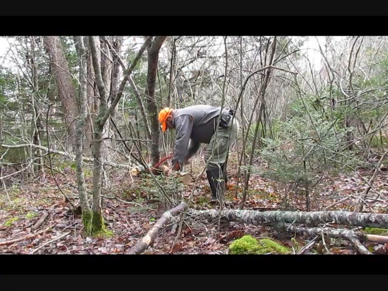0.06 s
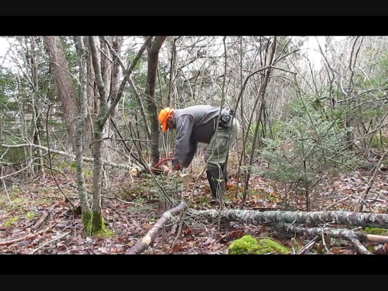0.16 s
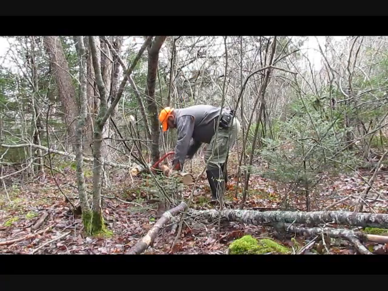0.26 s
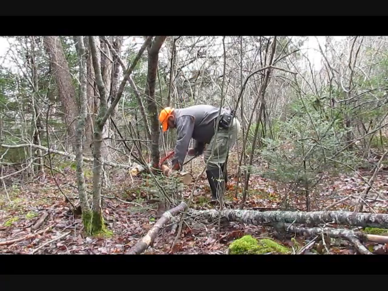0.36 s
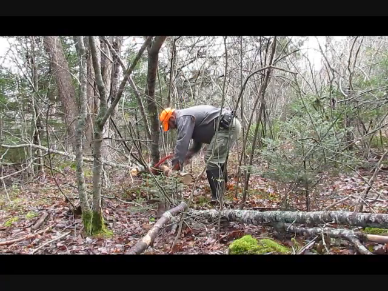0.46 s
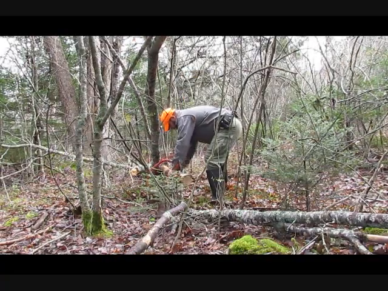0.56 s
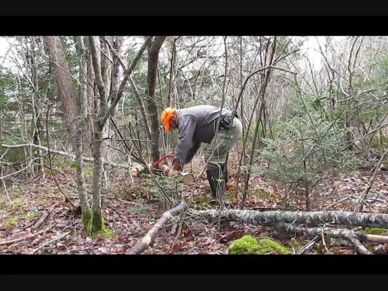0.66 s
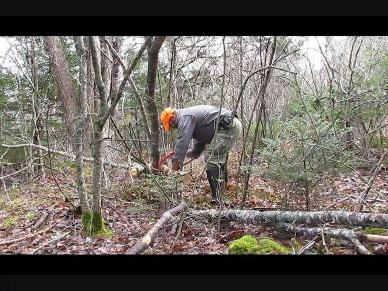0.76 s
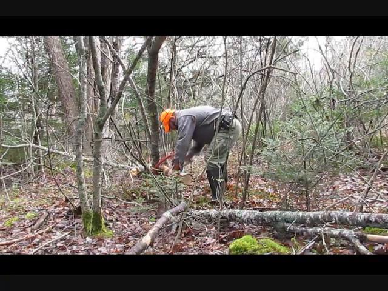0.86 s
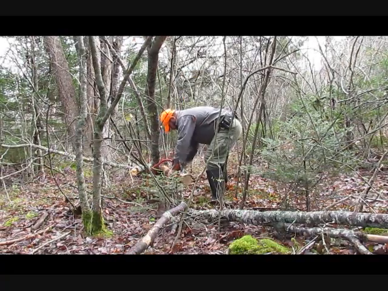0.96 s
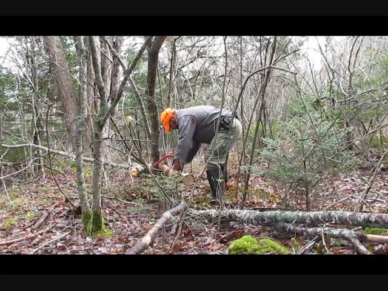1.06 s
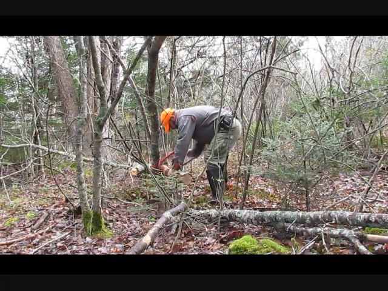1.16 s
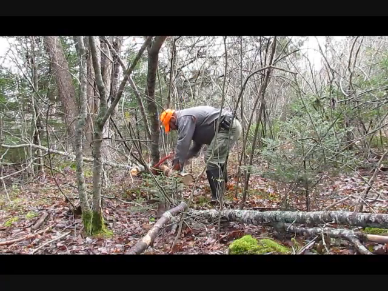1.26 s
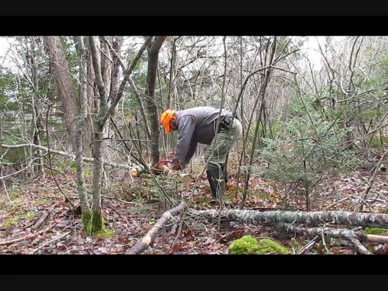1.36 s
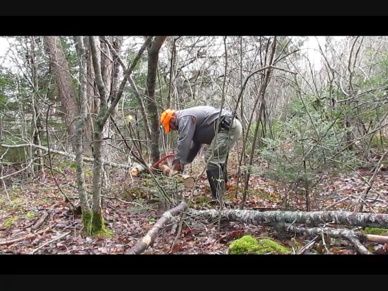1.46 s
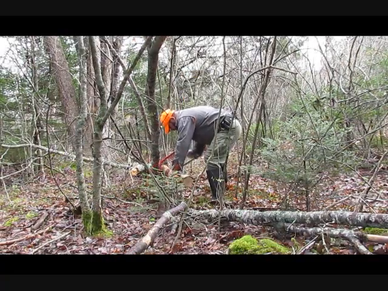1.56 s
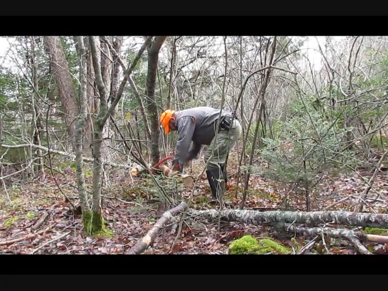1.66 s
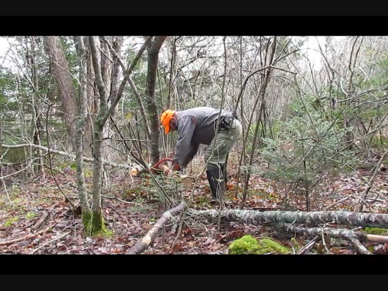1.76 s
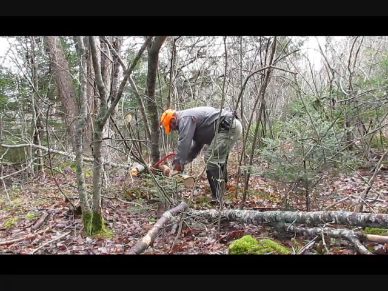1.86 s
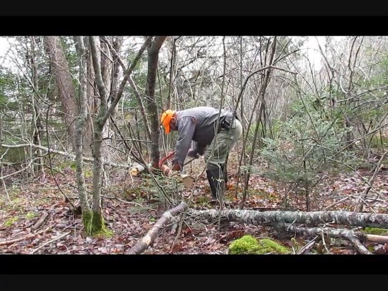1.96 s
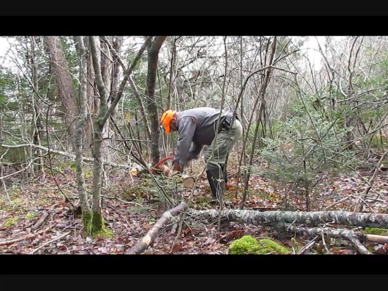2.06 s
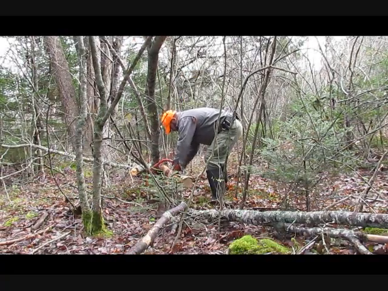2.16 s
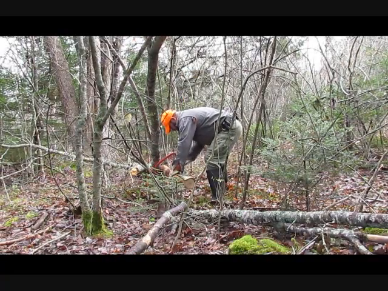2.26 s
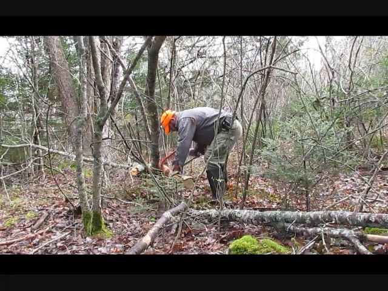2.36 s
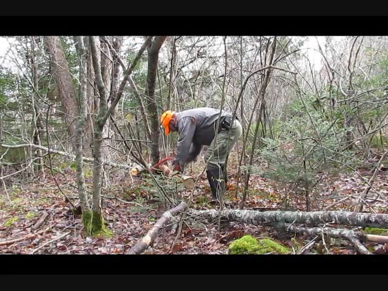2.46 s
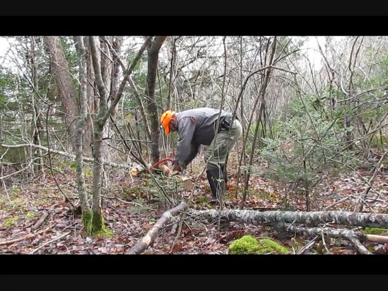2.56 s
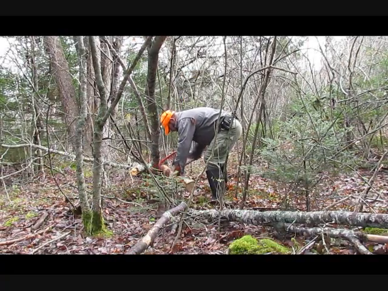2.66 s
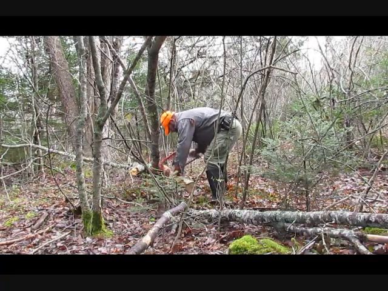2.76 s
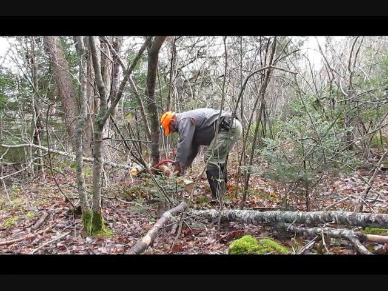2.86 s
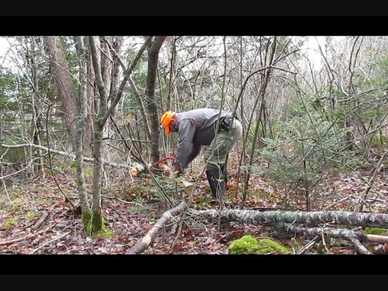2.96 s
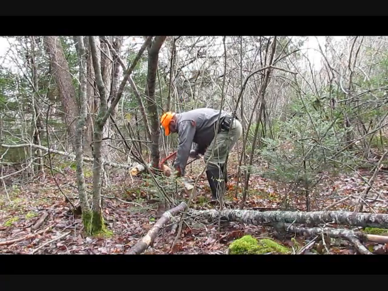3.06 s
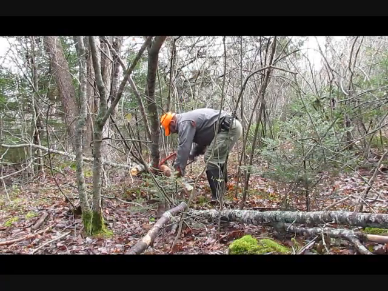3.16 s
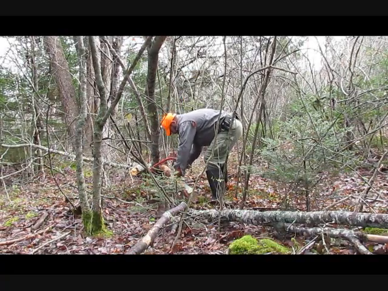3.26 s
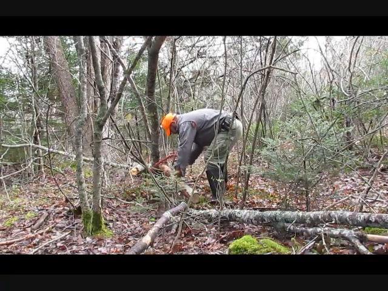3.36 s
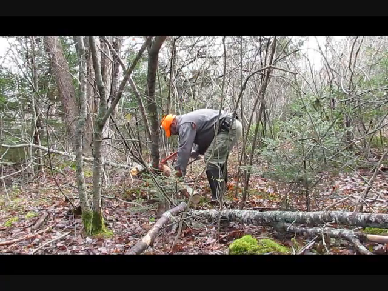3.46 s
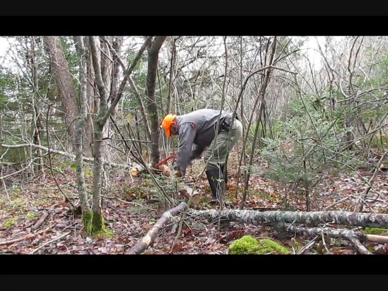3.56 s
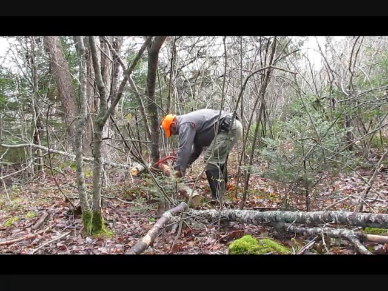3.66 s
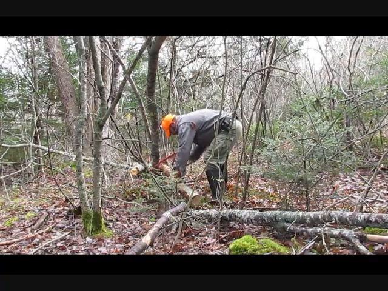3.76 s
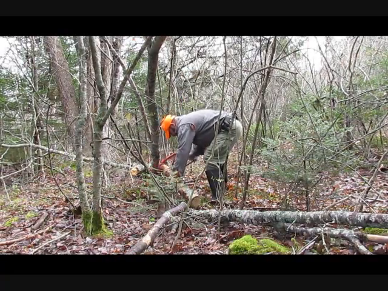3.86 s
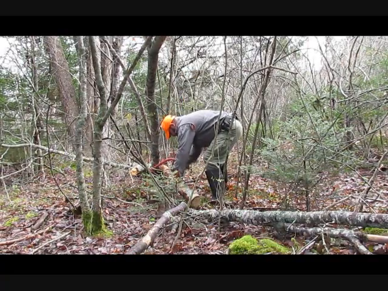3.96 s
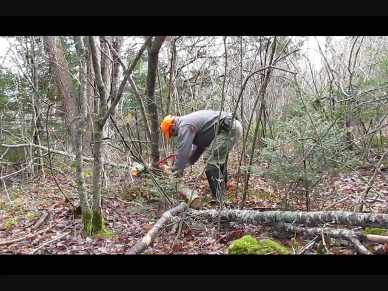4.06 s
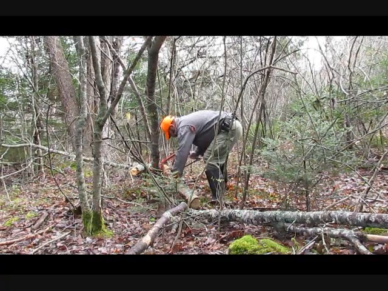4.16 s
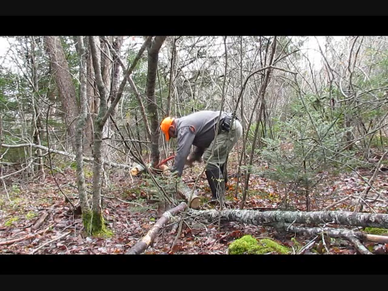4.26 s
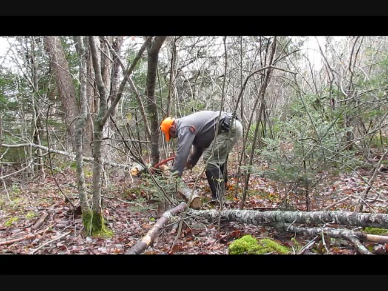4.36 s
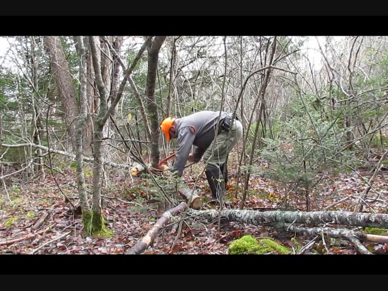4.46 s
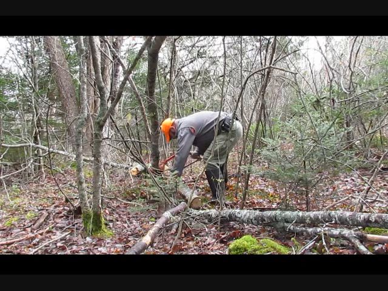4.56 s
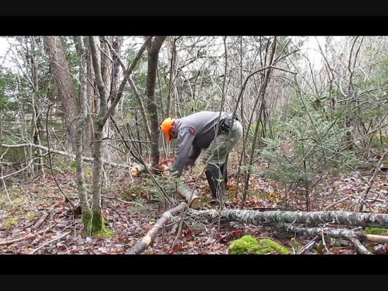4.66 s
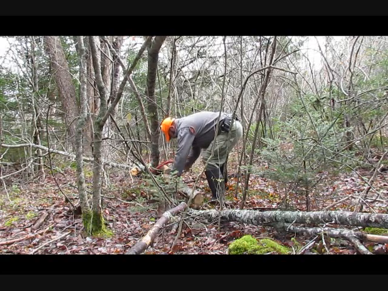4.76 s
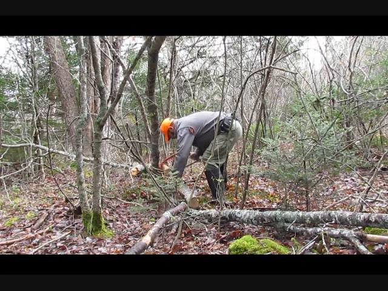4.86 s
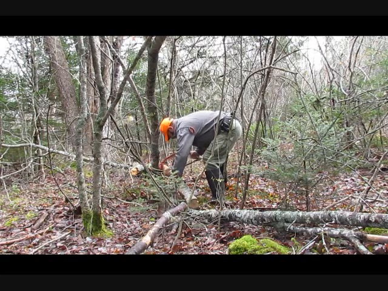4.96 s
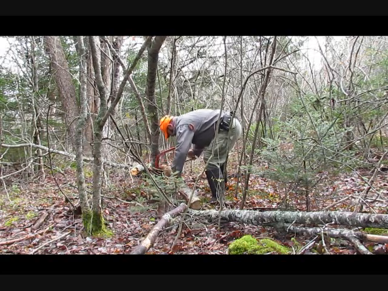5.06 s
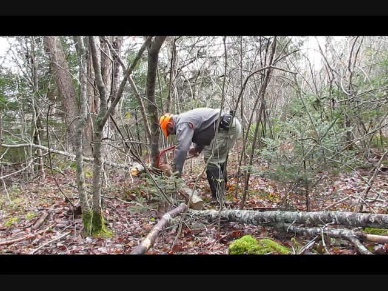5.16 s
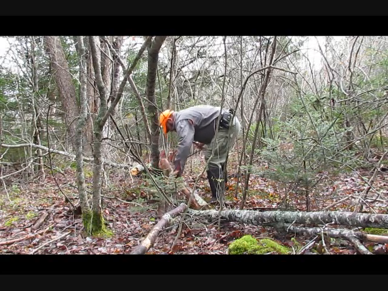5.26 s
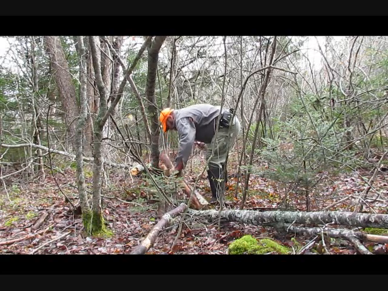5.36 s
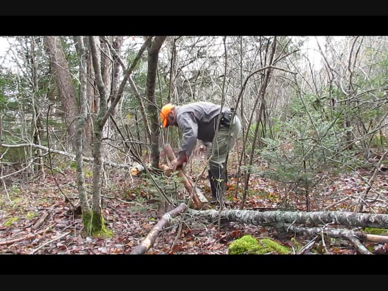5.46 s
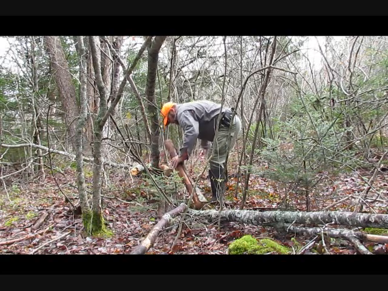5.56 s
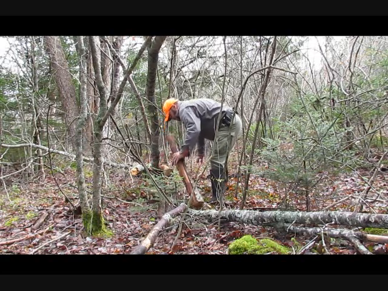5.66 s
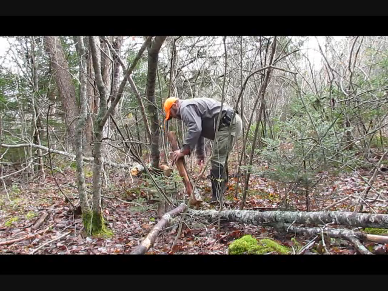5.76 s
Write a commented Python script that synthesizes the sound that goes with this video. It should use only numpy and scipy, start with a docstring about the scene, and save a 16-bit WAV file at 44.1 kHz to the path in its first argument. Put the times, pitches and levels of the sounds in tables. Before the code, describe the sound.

Outdoors in the woods, a bow saw cuts dry wood at about five strokes a second, push and return alternating louder and softer. Teeth catch with gritty bursts and short metallic rings. Near the end a sharp crack breaks the wood, then lesser snaps and a faint leaf rustle. Stereo microphone, clear and fairly bright, with a thin scatter of echoes from the trees.

```python
"""Bow saw in a dead trunk

A bow saw makes about five strokes a second in a wood: fracture grains rasp and drive blade and log resonances.
Caught teeth add bursts and frame ring; decaying sines knock and chatter.
Resonant noise bursts snap the last fibres; the blade rings free and filtered grains rustle as leaves.
Scattered echoes, a ground bounce, still-wood noise, a faint 1 kHz swell and low gusts surround the saw."""
import sys
import numpy as np
from scipy import signal
from scipy.fft import rfft, irfft
from scipy.io import wavfile

SR = 44100
rng = np.random.default_rng(int(sys.argv[2]) if len(sys.argv) > 2 else 0)


def store_wav(level_fs):
    """Save 16-bit WAV to argv[1]."""
    pcm = np.round(np.clip(np.atleast_2d(level_fs), -1, 1) * 32767)
    wavfile.write(sys.argv[1], SR, pcm.T.astype(np.int16))


N = 257103

# saw strokes, cutting and returning in turn: (fastest moment [s], rasp level [dB])
STROKES = [(0.123, -20.5), (0.343, -28), (0.538, -18.5), (0.767, -26.5), (0.954, -20), (1.168, -25.5),
           (1.341, -20.5), (1.555, -26), (1.729, -20.5), (1.948, -25.5), (2.132, -20), (2.332, -22.5),
           (2.51, -20.5), (2.717, -28), (2.889, -17.5), (3.062, -28.5), (3.244, -20), (3.429, -28.5),
           (3.608, -16.5), (3.809, -28), (3.977, -17.5), (4.165, -23.5), (4.326, -20.5), (4.535, -20.5),
           (4.695, -18.5), (4.879, -33)]
# stroke timing by force: (rasp level [dB], speeding-up time scale [s], slowing-down time scale [s])
STROKE_PACE = [(-37, 0.021, 0.037), (-28.5, 0.081, 0.069), (-23.5, 0.069, 0.054), (-19.5, 0.051, 0.044)]
# tooth snags, hard and faint: (time [s], rasp level [dB], steel ring level [dB], rasp T60 [s])
SNAGS = [(0.0, -22, -40, 0.068), (0.385, -21.5, -31, .022), (0.473, -36, -51, 0.057),
         (0.7213, -25, -51, .029), (0.9267, -14, -43, 0.026), (1.2965, -18.5, -44, 0.041),
         (1.311, -13, -46, 0.038), (1.4017, -11, -23, 0.041), (1.4314, -15.5, -28.5, 0.022),
         (1.533, -18.5, -26.5, 0.035), (1.671, -32, -48, .068), (1.7502, -15, -26.5, 0.027),
         (2.0891, -15, -32.5, 0.033), (2.2557, -20, -34.5, 0.033), (2.5376, -12.5, -26, 0.05),
         (2.577, -5, -22, 0.021), (2.6556, -26.5, -41, .048), (2.828, -16, -47, 0.016),
         (2.9512, -14.5, -28, 0.026), (2.9667, -12.5, -27, 0.065), (3.2056, -18, -33, 0.017),
         (3.3207, -21, -30.5, 0.062), (3.3508, -15.5, -32, 0.024), (3.475, -21.5, -29.5, .032),
         (3.6793, -16, -35, 0.028), (3.7905, -20, -40, 0.049), (3.9974, -6, -25.5, 0.017),
         (4.1026, -21.5, -39, .045), (4.5162, -16, -23, 0.027), (4.7206, -11.5, -28, 0.035),
         (4.7792, -36, -36, 0.033)]
# log knocks on its supports: (time [s], level [dB], pitch [Hz])
BUMPS = [(2.157, -42, 426), (3.476, -43, 125), (3.57, -30.5, 434), (3.975, -37, 185), (4.317, -33.5, 167),
         (4.681, -37, 206), (5.288, -44, 215)]
# blade chatter in the cut: (time [s], level [dB], pitch [Hz])
CHATTER = [(2.005, -23, 1660), (2.722, -17, 1280), (2.741, -20.5, 1210), (2.768, -22, 1900),
           (3.837, -26, 1380), (3.852, -24, 1230)]
# dry wood snaps: (time [s], crack level [dB], crack centre [Hz], body level [dB], crack T60 [s])
SNAPS = [(4.748, -3.5, 11500, -31, 0.0085), (4.798, -32, 10000, -48, .019), (4.98, -36.5, 9000, -53, 0.047),
         (5.1665, -15, 11300, -37, 0.019), (5.2882, -33, 8510, -42, 0.015), (5.694, -31, 8800, -41, 0.027),
         (5.8057, -27, 10000, -53, .0078), (5.8176, -20.5, 10600, -33, 0.019)]
# faint ring as the blade leaves the cut: (time [s], level [dB])
RELEASE = (5.018, -43)
# stirred leaves: (loudest moment [s], half length [s], level [dB])
LEAVES = [(5.15, 0.84, -51.5), (5.71, 0.071, -42.5), (5.81, 0.044, -46.5)]
# faint swell of background noise near 1 kHz: (loudest moment [s], half length [s], level [dB])
MURMUR = (5.55, .07, -55)
# gusts on the microphone: (strongest moment [s], half length [s], level [dB])
GUSTS = [(0.38, 0.12, -63), (0.83, 0.2, -57), (1.83, 0.05, -62), (2.36, .12, -63), (4.41, .05, -66)]

# blade resonances damped by the cut: (frequency [Hz], width [Hz], relative level [dB])
BLADE_MODES = [(1740, 220, 0), (1980, 280, -2.5), (2700, 380, -11), (3550, 200, -15), (5260, 280, -9),
               (6020, 260, -10), (7120, 240, -7), (10750, 200, -9), (13550, 120, -12)]
# log resonances: (frequency [Hz], width [Hz], relative level [dB])
LOG_MODES = [(188.6, 21, -5.5), (240, 33, -4.5), (375, 50, -7.5), (442.2, 13.7, 1.5), (594, 15, -5),
             (693, 84, -1), (1019, 87, 0.5), (1230, 200, -5.5)]
# bow frame resonances damped by the hands: (frequency [Hz], width [Hz], relative level [dB])
FRAME_MODES = [(2670, 130, 0), (2950, 400, -5), (3560, 220, -8)]
# free blade resonances: (frequency [Hz], width [Hz], relative level [dB])
FREE_BLADE_MODES = [(1780, 90, -4), (2030, 140, -8), (2680, 110, -10), (5230, 100, -8), (6030, 100, -4),
                    (9230, 200, -1), (10500, 500, -3)]
# snapping twig resonances: (frequency [Hz], width [Hz], relative level [dB])
TWIG_MODES = [(1020, 760, 2.5), (1900, 700, 2.5), (2920, 930, 2)]

# tearing-fibre spectrum: (frequency [Hz], relative level per Hz [dB])
RASP_SPECTRUM = [(500, -35.5), (1400, -20.5), (2500, -7), (4200, -6.5), (5200, -2), (6700, 0), (8200, -1),
                 (9700, 2), (10900, 1), (11800, -4), (12900, -14.5), (13900, -10), (15000, -31)]
# leaf rustle filter: (frequency [Hz], relative gain [dB])
RUSTLE_SPECTRUM = [(470, -52), (800, -1), (1200, -5.5), (1910, -4), (2790, -2), (5490, -4.5), (10300, 3),
                   (12900, -4), (15000, -53)]
# still-wood spectrum: (frequency [Hz], relative level per Hz [dB])
AIR_SPECTRUM = [(40, -46), (90, 6.5), (130, 1), (250, -1.5), (500, 1), (800, -0.5), (980, 3), (1200, -1),
                (2000, -2.5), (4000, -6.5), (7000, -3.5), (10500, -29), (13300, -9), (15000, -50)]
# stereo width of the saw: (frequency [Hz], side minus mid [dB])
SAW_WIDTH = [(100, -36), (700, -48), (1800, -21.5), (2700, -10.5), (3800, -4.5), (5500, -13.5),
             (8000, -8.5), (12000, -4.5), (14500, -17)]
# stereo width of echoes and air: (frequency [Hz], side minus mid [dB])
SURROUND_WIDTH = [(90, -22), (300, -18.5), (1000, -9.5), (3000, 5), (10000, 3.5)]
# microphone pair balance: (frequency [Hz], left minus right [dB])
BALANCE = [(2000, -0.5), (2800, -0.5), (4000, 1.5), (5500, 0), (6700, -3), (8100, 0.5), (10300, -4.5),
           (12500, -0.5)]

BLADE_RE_RASP_DB = -6.3
HARD_RASP_DB, HARD_LOG_DB = -20, -40
LOG_FOLLOWS = 0.76  # log dB per dB of rasp
SLIDE_POLE_HZ = 5.94  # pole rate of the pitch wander
GRIP_LEAD = 1.05  # in speeding-up time scales
GRIP_RASP_RE_STROKE_DB, GRIP_STEEL_RE_STROKE_DB, GRIP_T60_S = -9, -23, 0.028
SNAG_BLADE_RE_STEEL_DB, SNAG_LOG_RE_STEEL_DB = 3, -13
ROCK_MAX_RE_RASP_DB, ROCK_LOW_HZ, ROCK_HIGH_HZ = -21.5, 174, 473
MURMUR_HZ, MURMUR_WIDTH_HZ = 1000, 110
GROUND_ECHO_S, GROUND_ECHO_DB = 0.0017, -23.5
WOOD_T60_S, ECHO_DB, ECHO_SIDE_DB = 0.21, -10.5, -8.5  # side is relative to the scaled echoes
AIR_DB = -53
BREEZE_DB, BREEZE_SWING_DB = -77.5, 9.5
CUTOFF_HZ = 15400


def from_db(db):
    """Decibels to gain."""
    return np.exp(np.asarray(db) * (np.log(10) / 20))


def rms_one(x):
    """Scale to rms 1."""
    return x / np.sqrt(np.mean(x ** 2) + 1e-20)


def seconds():
    """Time of every sample."""
    return np.arange(N) / SR


def noise_pair():
    """Independent white noise for two channels."""
    return rng.standard_normal((2, N))


def colour(x, points, share=1):
    """Causal minimum-phase filter through (Hz, dB) points; share scales the dB."""
    size = 4096
    hz, db = np.transpose(points)
    bins_hz = np.maximum(np.arange(size // 2 + 1) * SR / size, 1)
    gain = from_db(share * np.interp(np.log(bins_hz), np.log(hz), db))
    cepstrum = irfft(np.log(gain))
    # fold the cepstrum onto positive time
    cepstrum[1:size // 2] *= 2
    cepstrum[size // 2 + 1:] = 0
    response = np.array(irfft(np.exp(rfft(cepstrum))), ndmin=x.ndim)
    return signal.oaconvolve(x, response, axes=-1)[..., :N]


def drift(pole_hz):
    """Two-pole lowpass noise of rms 1, computed every 16 samples after a run-in."""
    r = np.exp(-2 * np.pi * pole_hz * 16 / SR)
    raw = rng.standard_normal(N // 16 + 2002)
    slow = signal.lfilter([1], [1, -2 * r, r * r], raw)[2000:]
    return np.interp(np.arange(N) / 16, np.arange(len(slow)), rms_one(slow))


def resonate(x, hz, width_hz):
    """One two-pole resonance with about unit peak gain."""
    r = np.exp(-np.pi * width_hz / SR)
    zeros = np.array([1, 0, -1]) * (1 - r * r) / 2
    poles = [1, -2 * r * np.cos(2 * np.pi * hz / SR), r * r]
    return signal.lfilter(zeros, poles, x + 1e-18)


def body(force, modes):
    """Parallel resonances with alternating signs."""
    out = 0
    for k, (hz, width_hz, db) in enumerate(modes):
        out = out + (-1) ** k * from_db(db) * resonate(force, hz, width_hz)
    return out


def grains(per_s, spread_db):
    """Random fractures of uneven size, as mid and side signals of similar power."""
    chance = np.clip(per_s / SR, 1e-4, 1)
    sizes = from_db(spread_db * np.minimum(rng.exponential(1, N), 4))
    hits = rng.random(N) < chance
    signs = rng.choice([-1, 1], (2, N))
    # sparser grains are larger, so density leaves the power alone
    return rms_one(hits * sizes / np.sqrt(chance) * signs)


def onset_decay(age_s, db, t60_s, rise_s):
    """Quick rise into an exponential decay."""
    return from_db(db - 60 * age_s / t60_s) * (1 - np.exp(-(age_s / rise_s) ** 2))


def bursts(times_s, dbs, t60s_s, rise_s):
    """Power-summed envelope of jolts that rise quickly and die away."""
    power = np.zeros(N)
    for time_s, db, t60_s in zip(times_s, dbs, t60s_s):
        start = max(int(time_s * SR), 0)
        age_s = np.arange(min(N - start, SR // 2)) / SR
        power[start:start + len(age_s)] += onset_decay(age_s, db, max(t60_s, 0.002), rise_s) ** 2
    return np.sqrt(power)


def swells(rows):
    """Sum of Gaussian swells, each (s, half length s, dB)."""
    return sum(from_db(db) * np.exp(-((seconds() - s) / half_s) ** 2) for s, half_s, db in rows)


def pace():
    """Speeding-up and slowing-down time scales of each stroke, from its force."""
    db, rise_s, fall_s = np.transpose(STROKE_PACE)
    force_db = np.transpose(STROKES)[1]
    return np.interp(force_db, db, rise_s), np.interp(force_db, db, fall_s)


def sweep(dbs, steepness, lag_s=0):
    """Stroke envelope: swells with blade speed and sinks towards each turn."""
    coarse_s = seconds()[::128, None]
    middle_s = np.transpose(STROKES)[0] + lag_s
    phase = (coarse_s - middle_s) / np.where(coarse_s < middle_s, *pace())
    power = np.sum(from_db(dbs) ** 2 * (1 + phase ** 2) ** -steepness, axis=1)
    return np.interp(seconds(), coarse_s[:, 0], np.sqrt(power))


def splintering(force, depth, count):
    """Resonances of drifting gain favour one pitch, then another, shifting the colour."""
    out = force
    for hz in np.geomspace(1000, 11000, count):
        out = out + depth * np.tanh(drift(22)) * resonate(force, hz, width_hz=hz / 5)
    return out


def sliding_body(force, modes, wander, patchy_db):
    """As the contact point travels, each resonance wanders in pitch and drive."""
    out, samples = 0, np.arange(N)
    for k, (hz, width_hz, db) in enumerate(modes):
        ring = resonate(force, hz, width_hz)
        # a moving read point bends pitch; wander is the rms fractional bend
        reach = wander * SR / (2 * np.pi * SLIDE_POLE_HZ)
        place = samples + reach * drift(SLIDE_POLE_HZ)
        bent = np.array([np.interp(place, samples, part) for part in ring])
        out = out + (-1) ** k * from_db(db + patchy_db * drift(11.5)) * bent
    return out


def sawing():
    """Teeth bite unevenly and tear fibres; one force rasps and drives blade and log."""
    rasp_db = np.transpose(STROKES)[1]
    log_db = HARD_LOG_DB + LOG_FOLLOWS * (rasp_db - HARD_RASP_DB)
    speed = sweep(np.zeros(len(STROKES)), steepness=1.5)
    # fast and slow uneven roughness of the bite
    bite = rms_one(from_db(1.44 * np.tanh(drift(100)) + 1.0 * np.tanh(drift(34))))
    force = bite * grains(2500 + 12000 * speed, spread_db=2.5)

    rasp = rms_one(colour(splintering(force, depth=0.73, count=11), RASP_SPECTRUM))
    rasp = rasp * sweep(rasp_db, steepness=4.58)
    blade = rms_one(sliding_body(force, BLADE_MODES, wander=0.0222, patchy_db=1.0))
    blade = blade * sweep(rasp_db + BLADE_RE_RASP_DB, steepness=4.46)
    log = rms_one(sliding_body(force, LOG_MODES, wander=0.0379, patchy_db=2.5))
    log = log * sweep(log_db, steepness=2.79, lag_s=0.0087)
    return rasp + blade + log


def catches():
    """Columns of tooth catches: the listed snags, and a light grip as each stroke gets going."""
    middle_s, db = np.transpose(STROKES)
    grip_s = middle_s - GRIP_LEAD * pace()[0]
    grip_db = db + 2.1 * rng.standard_normal(len(db))
    rasp_db, steel_db = grip_db + GRIP_RASP_RE_STROKE_DB, grip_db + GRIP_STEEL_RE_STROKE_DB
    grips = np.transpose([grip_s, rasp_db, steel_db, np.full(len(db), GRIP_T60_S)])
    return np.vstack([SNAGS, grips]).T


def frame(times_s, steel_db):
    """Each catch jerks the taut frame: resonant noise rings briefly under the hands."""
    ring = rms_one(body(noise_pair(), FRAME_MODES))
    return ring * bursts(times_s, steel_db, np.full(len(times_s), 0.08), rise_s=0.0024)


def snags(times_s, rasp_db, steel_db, t60s_s):
    """A tooth hooks and rips free: dense grains burst through blade and log."""
    force = grains(16000, spread_db=-1.0)
    rasp = rms_one(colour(force, RASP_SPECTRUM)) * bursts(times_s, rasp_db, t60s_s, rise_s=0.0011)
    blade_db, log_db = steel_db + SNAG_BLADE_RE_STEEL_DB, steel_db + SNAG_LOG_RE_STEEL_DB
    blade = rms_one(body(force, BLADE_MODES)) * bursts(times_s, blade_db, t60s_s * 1.93, rise_s=0.00089)
    log = rms_one(body(force, LOG_MODES)) * bursts(times_s, log_db, t60s_s * 3.6, rise_s=0.00054)
    return rasp + blade + log + frame(times_s, steel_db)


def rocking():
    """Each cutting stroke rocks the log just before its fastest moment: (s, dB, Hz) rows."""
    middle_s, db = np.transpose(STROKES[::2])
    early, weakness, pitch = rng.random((len(db), 3)).T
    rock_db = db + ROCK_MAX_RE_RASP_DB - 6 * weakness
    rock_hz = ROCK_LOW_HZ * (ROCK_HIGH_HZ / ROCK_LOW_HZ) ** pitch
    return np.transpose([middle_s - 0.0304 * early, rock_db, rock_hz])


def knocks(rows, t60_s, rise_s):
    """Each knock is a decaying sine at its own pitch."""
    out = np.zeros(N)
    for time_s, db, hz in rows:
        start = int(time_s * SR)
        age_s = np.arange(min(N - start, SR // 4)) / SR
        ring = onset_decay(age_s, db, t60_s, rise_s) * np.sin(2 * np.pi * hz * age_s)
        out[start:start + len(age_s)] += ring
    return out


def ground(x):
    """Adds a ground bounce whose delay drifts a little."""
    late_s = seconds() - GROUND_ECHO_S * (1 + 0.038 * drift(3.9))
    bounce = np.array([np.interp(late_s, seconds(), part) for part in x])
    return x + from_db(GROUND_ECHO_DB) * bounce


def trees(x):
    """Trunks scatter a thin decaying tail of echoes, independent for mid and side."""
    age_s = np.arange(int(0.8 * SR)) / SR
    shape = (2, len(age_s))
    echoes = rng.standard_normal(shape) * (rng.random(shape) < 2500 / SR)
    echoes *= onset_decay(age_s, 0, WOOD_T60_S, rise_s=0.0019)
    echoes /= np.sqrt(np.sum(echoes ** 2, axis=1, keepdims=True))
    return signal.fftconvolve(x[None], echoes, axes=1)[:, :N]


def still_wood():
    """Steady coloured noise as mid and side."""
    return from_db(AIR_DB) * rms_one(colour(noise_pair(), AIR_SPECTRUM))


def breeze():
    """Light air and gusts rumble on the microphone ports, largely alike in both."""
    rumble = [(12, -18), (25, -22), (52, 0), (95, -3.0), (140, -11), (300, -9), (1500, -77)]
    shared, apart = colour(noise_pair(), rumble)
    flow = from_db(BREEZE_DB + BREEZE_SWING_DB * np.tanh(drift(3))) + swells(GUSTS)
    return flow * rms_one(shared + 0.33 * np.array([apart, -apart]))


def snaps():
    """Splinters and twigs break: broad resonant noise cracks over a longer woody body."""
    crack, out = colour(noise_pair(), RASP_SPECTRUM), 0
    for time_s, db, hz, _, t60_s in SNAPS:
        tone = rms_one(resonate(crack, hz, width_hz=8700))
        out = out + tone * bursts([time_s], [db], [t60_s], rise_s=0.00084)
    times_s, _, _, body_db, t60s_s = np.transpose(SNAPS)
    wood = rms_one(body(noise_pair(), TWIG_MODES))
    return out + wood * bursts(times_s, body_db, t60s_s * 3.2, rise_s=0.00051)


def loose_log():
    """The blade springs free and rings; the cut piece drags through leaves, a rustle of grains."""
    release_s, release_db = RELEASE
    steel = rms_one(body(noise_pair(), FREE_BLADE_MODES))
    steel = steel * bursts([release_s], [release_db], [0.5], rise_s=0.0024)
    crackle = grains(2000, spread_db=2.5)
    rustle = rms_one(colour(splintering(crackle, depth=0.84, count=7), RUSTLE_SPECTRUM))
    return steel + swells(LEAVES) * rustle


def murmur():
    """A faint swell of background noise: grains through one narrow resonance."""
    noise = rms_one(resonate(grains(2000, spread_db=2.5), MURMUR_HZ, MURMUR_WIDTH_HZ))
    return swells([MURMUR]) * noise


def scene():
    """Builds mid and side, then spreads them over the microphone pair."""
    work = ground(sawing() + snags(*catches()) + snaps() + loose_log() + murmur())
    work[0] += knocks([*BUMPS, *rocking()], t60_s=0.13, rise_s=0.0034)
    work[0] += knocks(CHATTER, t60_s=0.012, rise_s=0.00055)
    air = still_wood()
    echoes = from_db(ECHO_DB) * trees(work[0])

    mid = work[0] + echoes[0] + air[0]
    surround_side = from_db(ECHO_SIDE_DB) * echoes[1] + air[1]
    side = colour(work[1], SAW_WIDTH) + colour(surround_side, SURROUND_WIDTH)
    left = colour(mid + side, BALANCE, share=0.5)
    right = colour(mid - side, BALANCE, share=-0.5)
    return np.array([left, right]) + breeze()


def record(dry):
    """Cuts the top steeply with a Chebyshev lowpass."""
    lowpass = signal.cheby2(14, 70, CUTOFF_HZ + 700, fs=SR, output="sos")  # stopband edge
    return signal.sosfilt(lowpass, dry)


dry = scene()
out = record(dry)
store_wav(out)
```